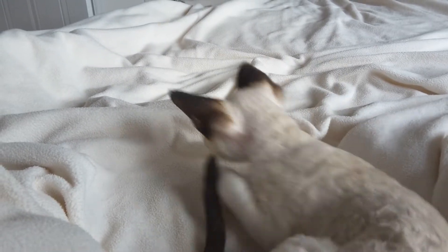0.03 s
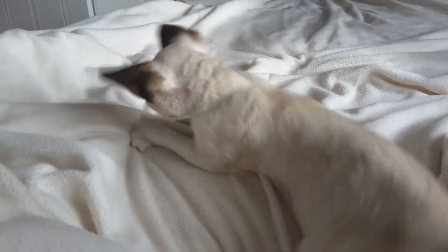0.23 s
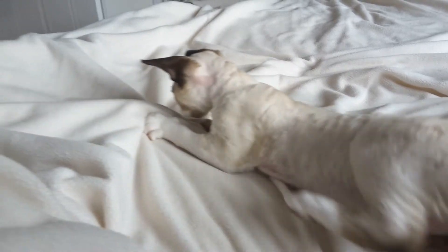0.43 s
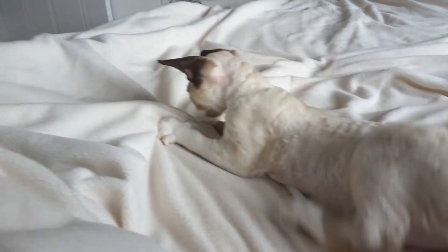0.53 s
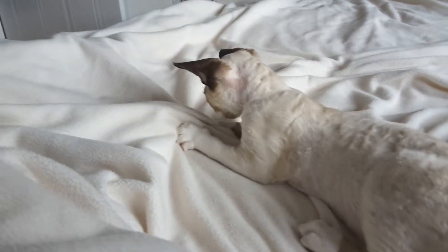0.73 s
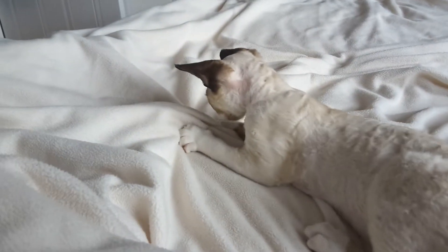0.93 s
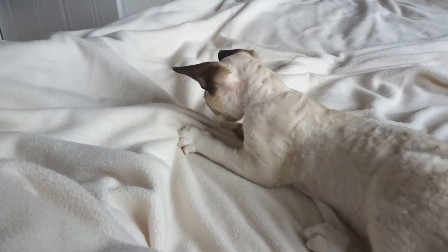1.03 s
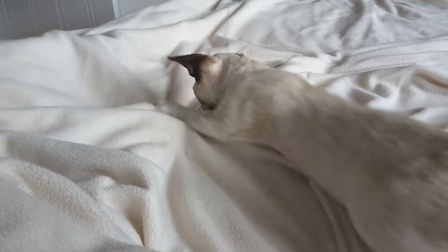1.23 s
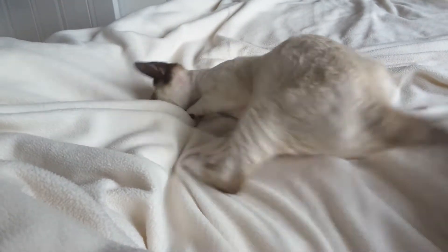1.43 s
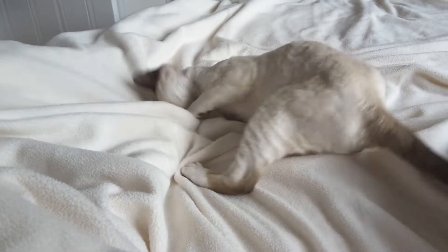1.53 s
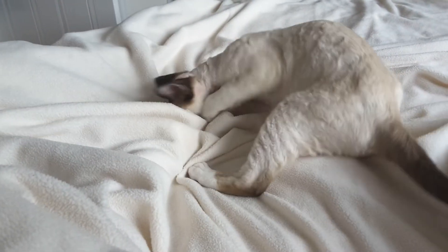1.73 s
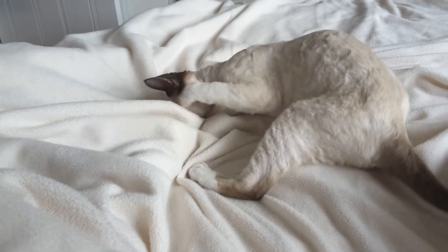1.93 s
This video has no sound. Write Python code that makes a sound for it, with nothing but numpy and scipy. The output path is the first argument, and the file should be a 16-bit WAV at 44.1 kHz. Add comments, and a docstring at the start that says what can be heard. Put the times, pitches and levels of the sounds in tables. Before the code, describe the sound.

A cat scuffles on a fleece blanket in two bursts of rustles, claw plucks and thumps.

```python
"""Cat pouncing on a blanket.

A cat pounces twice on fleece in a quiet bedroom. Its body slides over the cloth with a hiss and
a rumble, its claws pluck the taut folds and rasp through the pile, and its weight lands softly
on the mattress. Faint high ticks and a steady room tone fill the pauses."""
import sys
import numpy as np
from scipy import signal
from scipy.fft import rfft, irfft, next_fast_len
from scipy.io import wavfile
from scipy.ndimage import map_coordinates

SR = 44100
rng = np.random.default_rng(int(sys.argv[2]) if len(sys.argv) > 2 else 0)


def pcm_store(signal):
    """Save signal as 16-bit PCM."""
    levels = np.round(np.clip(np.atleast_2d(signal), -1, 1) * 32767)
    wavfile.write(sys.argv[1], SR, levels.astype(np.int16).T)


N = 2 * SR


def amp(db):
    """dB to gain."""
    return 10 ** (np.asarray(db) / 20)


def unit_rms(x):
    """Scale to rms 1."""
    return x / np.sqrt(np.mean(x ** 2) + 1e-20)


def log_interp(points, hz):
    """Interpolate (frequency [Hz], value) points on a log frequency axis."""
    knots_hz, values = np.transpose(points)
    return np.interp(np.log(hz + 1), np.log(knots_hz + 1), values)


def coloured(x, gain):
    """Minimum-phase filter with magnitude gain(hz)."""
    size = 2 * next_fast_len(N)
    magnitude = np.maximum(gain(np.fft.rfftfreq(size, 1 / SR)), 1e-6)
    cepstrum = irfft(np.log(magnitude))
    cepstrum[1:size // 2] *= 2
    cepstrum[size // 2 + 1:] = 0
    return irfft(rfft(x, size) * np.exp(rfft(cepstrum)), size)[:N]


def shaped(x, spectrum):
    """Filter by (frequency [Hz], gain [dB]) points; scale to rms 1."""
    return unit_rms(coloured(x, lambda hz: amp(log_interp(spectrum, hz))))


def flutter(knots_per_s, depth_db):
    """Smooth random gain."""
    position = np.arange(N) * knots_per_s / SR
    return amp(depth_db * map_coordinates(rng.standard_normal(N // 20), [position], mode="wrap"))


def grains(per_s, spread_db):
    """Random impulses of uneven size."""
    impulses = (rng.random(N) < per_s / SR) * np.sign(rng.standard_normal(N))
    return impulses * amp(spread_db * np.clip(rng.standard_normal(N), -2, 2))


def stroke(peak_s, rise_s, fall_s, roundness):
    """Swell, down to 1/e at rise_s before and fall_s after its peak."""
    t = np.arange(N) / SR - peak_s
    return np.exp(-np.abs(t / np.where(t < 0, rise_s, fall_s)) ** roundness)


def add(track, start_s, sound):
    """Mix sound in at start_s."""
    part = track[round(start_s * SR):][:len(sound)]
    part += sound[:len(part)]


def room_tone():
    """Steady, faint, mostly low noise."""
    # (frequency [Hz], relative level [dB])
    air_spectrum = [(20, -99), (50, -98), (130, -86), (250, -88), (400, -85), (600, -94), (1500, -96),
                    (3000, -104), (6000, -110), (9000, -110), (11500, -106), (16000, -109)]
    return amp(-66) * shaped(rng.standard_normal(N), air_spectrum)


def ticks():
    """Tiny dry bursts of treble noise."""
    # (time [s], level [dB])
    bursts = [(.0348, -54), (.8245, -59), (1.0375, -53.5), (1.8257, -55)]
    band_hz, t60_s = (6000, 13000), 0.007
    out, t = np.zeros(N), np.arange(SR // 50) / SR
    for start_s, db in bursts:
        add(out, start_s, amp(db - 60 * t / t60_s) * rng.standard_normal(len(t)))
    return signal.lfilter(*signal.butter(2, band_hz, "bandpass", fs=SR), out)


def body_slides():
    """Fur rubs fibres into a fine hiss while the shifting folds rumble."""
    # (peak [s], rise [s], fall [s], hiss [dB], rumble [dB])
    slides = [(.17, .10, 0.042, -71, -68), (0.276, 0.074, 0.16, -58, -54.5),
              (.415, 0.035, 0.052, -59.5, -68), (.66, 0.11, 0.14, -76.5, -78),
              (1.204, 0.03, 0.066, -58.5, -54.5), (1.326, 0.044, 0.057, -61, -59),
              (1.394, .008, .015, -63.5, -58.5), (1.457, 0.044, 0.074, -57, -49),
              (1.511, 0.034, 0.043, -57, -52), (1.629, 0.068, 0.11, -63, -66.5),
              (1.89, 0.073, 0.062, -76.5, -67.5)]
    # rubbed fibres (frequency [Hz], gain [dB])
    hiss_spectrum = [(100, -14), (500, 0), (1400, 3), (2500, 2.5), (4000, 0), (6500, -8.5), (8000, -4),
                     (9200, -18), (12000, -11), (16000, -35)]
    # shifting folds (frequency [Hz], gain [dB])
    rumble_spectrum = [(25, -26), (60, -7.5), (110, 2.5), (260, 1.5), (420, -7.5), (600, -6.5), (1200, -15),
                       (3000, -29.5)]
    hiss_power, rumble_power = np.zeros((2, N))
    for peak_s, rise_s, fall_s, hiss_db, rumble_db in slides:
        swell = stroke(peak_s, rise_s, fall_s, roundness=1.86)
        hiss_power += (amp(hiss_db) * swell) ** 2
        rumble_power += (amp(rumble_db) * swell) ** 2
    fibres = shaped(grains(per_s=5000, spread_db=4.5), hiss_spectrum)
    fibres *= flutter(knots_per_s=90, depth_db=0.7)
    folds = shaped(rng.standard_normal(N), rumble_spectrum)
    folds *= flutter(knots_per_s=60, depth_db=2.4)
    return np.sqrt(hiss_power) * fibres + np.sqrt(rumble_power) * folds


def fold_plucks():
    """A fold snaps taut with a dull pop and a crunch of fibres, then rings like a slack drumhead."""
    # (time [s], level [dB], low-pass [Hz], high-pass [Hz]); small folds lack bass
    plucks = [(0.2197, -40.5, 2000, 90), (.2398, -34.5, 3500, 496), (0.2457, -37.5, 900, 90),
              (.263, -41, 3000, 500), (.275, -42, 6000, 1800), (.2915, -33.5, 2000, 250),
              (0.3032, -40, 1800, 200), (0.3186, -30.5, 1500, 120), (0.3916, -28.5, 2220, 200),
              (0.3945, -18.5, 2700, 81), (.3975, -28.5, 6500, 1800), (0.4017, -18, 2120, 50.6),
              (0.689, -45.5, 2500, 460), (0.7049, -46.5, 2000, 353), (0.717, -55, 1800, 252),
              (1.2037, -32, 1600, 500), (1.2151, -32.5, 1290, 217), (1.2253, -30, 1000, 328),
              (1.227, -27, 1300, 420), (1.2381, -31, 900, 220), (1.3925, -44, 590, 70),
              (1.46, -39, 2500, 200), (1.493, -41.5, 4000, 404), (1.508, -42.5, 500, 90),
              (1.5133, -24, 1470, 260), (1.5158, -35, 4500, 706), (1.5163, -31.5, 500, 80),
              (1.5246, -38, 700, 120), (1.874, -52.5, 610, 100)]
    # taut cloth (frequency [Hz], relative level [dB], t60 [s])
    modes = [(126, -43, 0.021), (250, -9, 0.078), (405, -9, 0.041), (800, -17, 0.057), (987, -18, 0.037),
             (1196, -19, 0.035), (1530, -35, 0.022), (1963, -11.5, 0.022)]
    # fold snapping (frequency [Hz], gain [dB])
    snap_spectrum = [(30, -31.5), (120, 3.5), (300, 15), (600, -3), (1500, -5.5), (3000, -19.5),
                     (7000, -17), (15000, -20)]
    # fibres tearing loose (frequency [Hz], gain [dB])
    crunch_spectrum = [(100, -33), (500, 9), (1000, 4.5), (2000, -1), (3000, -5.5), (5500, -10),
                       (8000, -13.5), (12000, -21), (16000, -21)]
    ring_db, scatter_db = -7, 2.5
    crunch_db, crunch_rise_s, crunch_t60_s = -11.5, 0.00035, 0.018
    out, t = np.zeros(N), np.arange(SR // 5) / SR
    snap = shaped(signal.unit_impulse(N), snap_spectrum)[:len(t)]
    snap = 1.335 * snap / np.abs(snap).max()
    fibres = shaped(rng.standard_normal(N), crunch_spectrum)
    burst = amp(crunch_db - 60 * t / crunch_t60_s) * (1 - np.exp(-t / crunch_rise_s))
    for start_s, db, bright_hz, low_hz in plucks:
        ring = np.zeros(len(t))
        for hz, mode_db, t60_s in modes:
            decay = amp(mode_db + rng.normal(0, scatter_db) - 60 * t / t60_s)
            ring += decay * np.sin(2 * np.pi * hz * t)
        crunch = burst * np.roll(fibres, rng.integers(N))[:len(t)]
        pop = signal.lfilter(*signal.butter(2, bright_hz, fs=SR), snap + amp(ring_db) * ring)
        pop += signal.lfilter(*signal.butter(1, 2 * bright_hz, fs=SR), crunch)
        pop = signal.lfilter(*signal.butter(2, low_hz, "highpass", fs=SR), pop)
        add(out, start_s, amp(db) * pop)
    return out


def paw_thumps():
    """The mattress gives under a paw: a low push that sags in pitch."""
    # (time [s], level [dB], starting pitch [Hz])
    landings = [(.232, -50, 100), (0.398, -38, 121), (0.976, -64.5, 170), (1.281, -54, 159),
                (1.308, -49.5, 115), (1.384, -55, 89), (1.511, -41, 101), (1.655, -59, 190)]
    attack_s, t60_s, sag_hz_per_s = 0.0023, 0.12, 380
    out, t = np.zeros(N), np.arange(SR // 5) / SR
    for start_s, db, hz in landings:
        push = np.sin(2 * np.pi * (hz - sag_hz_per_s * t / 2) * t)
        envelope = amp(db - 60 * t / t60_s) * (1 - np.exp(-t / attack_s))
        add(out, start_s, envelope * push)
    return out


def claw_drags():
    """Claws catch and slip in the pile in uneven clusters: a dull rasp, thinner on taut cloth."""
    # (peak [s], rise [s], fall [s], level [dB], low-pass [Hz], high-pass [Hz])
    drags = [(.25, 0.037, 0.038, -52, 1730, 100), (0.3, 0.018, 0.0087, -41, 980, 202),
             (0.335, 0.019, 0.028, -49, 1110, 180), (0.411, 0.022, 0.023, -45.5, 1430, 100),
             (0.446, 0.031, .016, -52, 1010, 151), (.635, .02, 0.052, -67.5, 1370, 252),
             (.838, 0.014, 0.019, -59, 1280, 317), (1.199, 0.016, 0.012, -46, 1630, 328),
             (1.224, 0.019, 0.019, -42.5, 1450, 277), (1.275, 0.023, 0.031, -56, 1910, 100),
             (1.683, 0.087, 0.047, -64.5, 1730, 610)]
    # claw on pile (frequency [Hz], gain [dB])
    scrape_spectrum = [(40, 2), (130, -11.5), (220, 2.5), (400, -1), (550, -5.5), (750, -2.5), (1150, -8),
                       (1550, -0.5), (3000, -22)]
    out = np.zeros(N)
    for peak_s, rise_s, fall_s, db, bright_hz, low_hz in drags:
        swell = stroke(peak_s, rise_s, fall_s, roundness=1.7)
        catches = grains(per_s=900, spread_db=3.5) * flutter(knots_per_s=150, depth_db=3.1) * swell
        band = lambda hz: hz ** 2 / np.hypot(hz ** 2, low_hz ** 2) / (1 + (hz / bright_hz) ** 5)
        rasp = coloured(catches, lambda hz: amp(log_interp(scrape_spectrum, hz)) * band(hz))
        out += amp(db) * unit_rms(rasp) * np.sqrt(np.mean(swell ** 2))
    return out


def bedroom_reverb(x):
    """Short, soft tail of a furnished room."""
    # (frequency [Hz], t60 [s])
    decay_times = [(100, 0.073), (400, 0.13), (2000, 0.13), (10000, 0.064)]
    predelay_s = 0.008
    hz, t, noise = signal.stft(rng.standard_normal(SR // 2), SR, nperseg=256)
    decay = amp(-60 * t / log_interp(decay_times, hz)[:, None])
    _, tail = signal.istft(noise * decay, SR, nperseg=256)
    delayed = np.pad(x, (round(predelay_s * SR), 0))
    return signal.fftconvolve(delayed, tail / np.linalg.norm(tail))[:N]


def scene():
    """Mono mix: cat, reverb, room tone, ticks."""
    cat = body_slides() + claw_drags() + fold_plucks() + paw_thumps()
    return (cat + amp(-14.5) * bedroom_reverb(cat) + room_tone() + ticks())[None]


def record(dry):
    """Low cut, slight DC offset, brick-wall band limit."""
    low_cut_hz, dc_offset, top_hz = 14, -0.00038, 15800
    size = 2 * next_fast_len(N)
    thinned = signal.lfilter(*signal.butter(2, low_cut_hz, "highpass", fs=SR), dry) + dc_offset
    passband = np.fft.rfftfreq(size, 1 / SR) < top_hz
    return irfft(rfft(thinned, size) * passband, size)[..., :N]


dry = scene()
out = record(dry)
pcm_store(out)
```